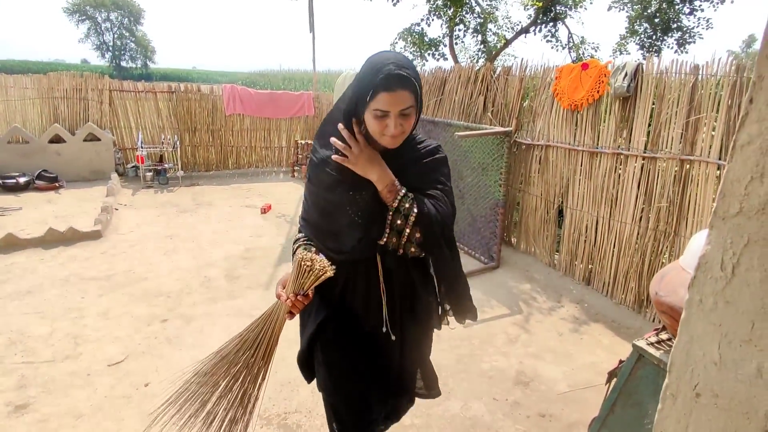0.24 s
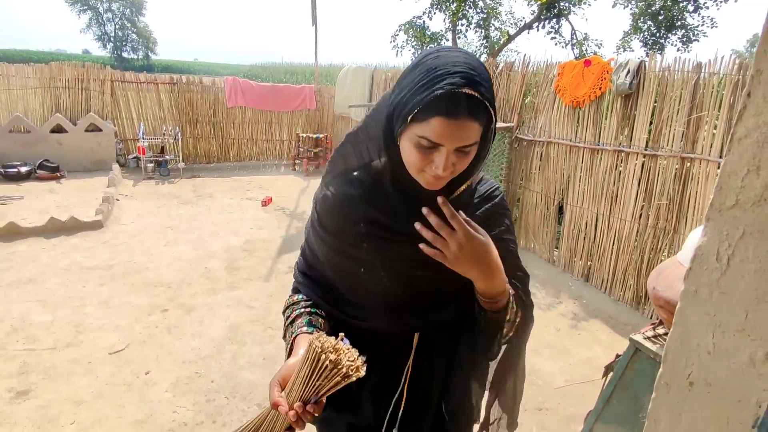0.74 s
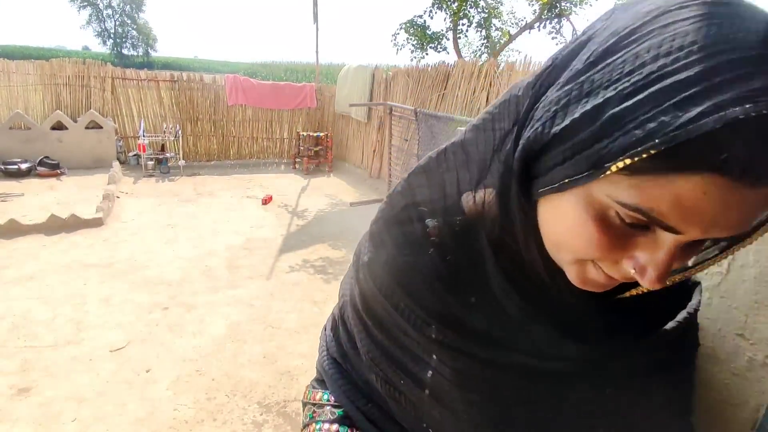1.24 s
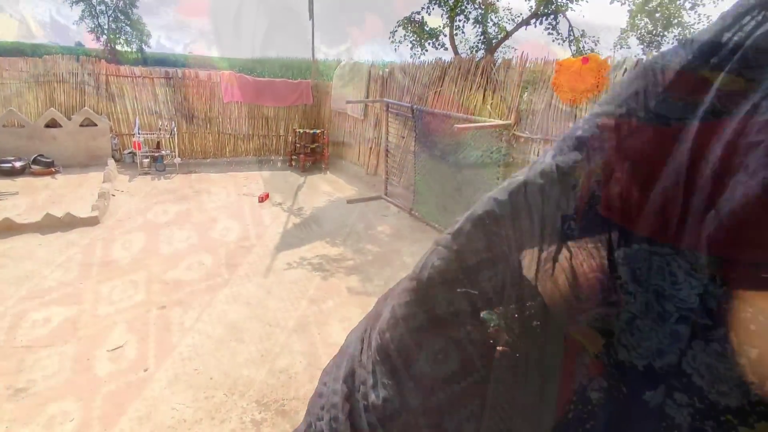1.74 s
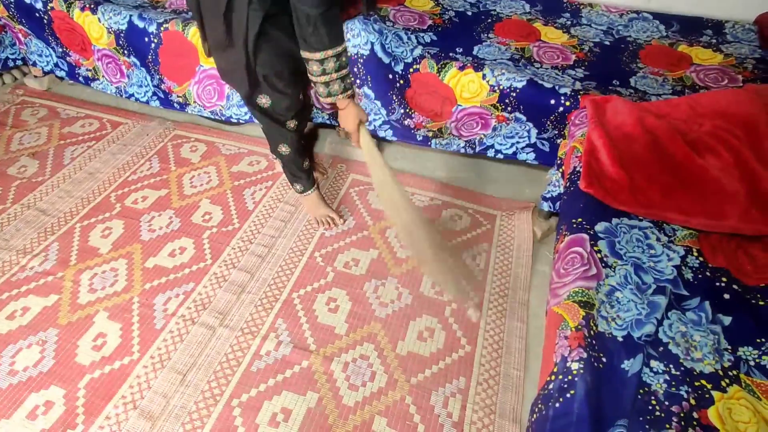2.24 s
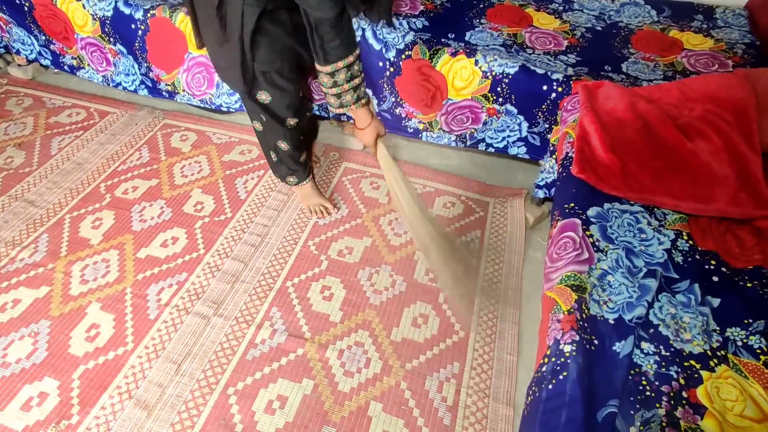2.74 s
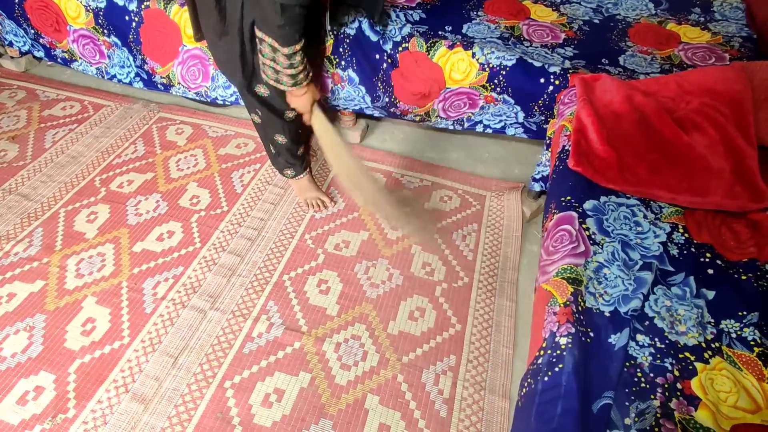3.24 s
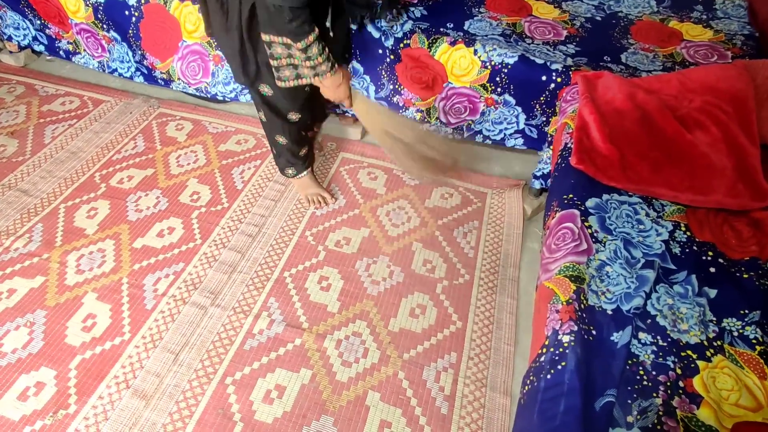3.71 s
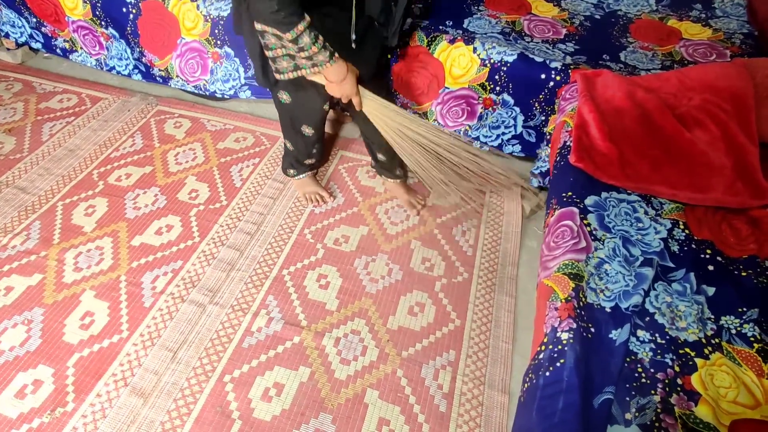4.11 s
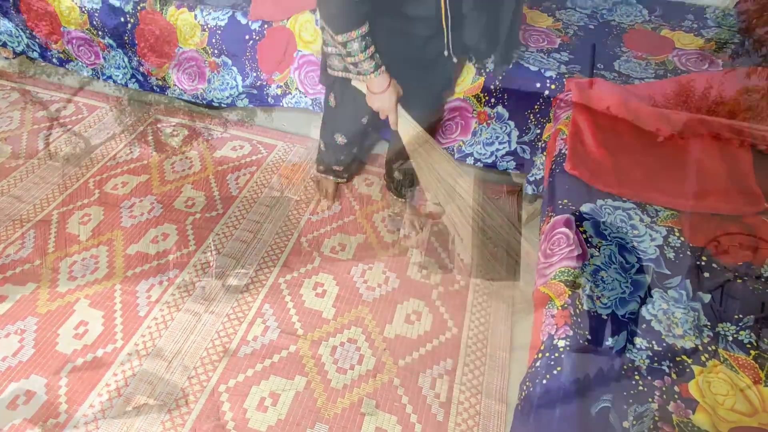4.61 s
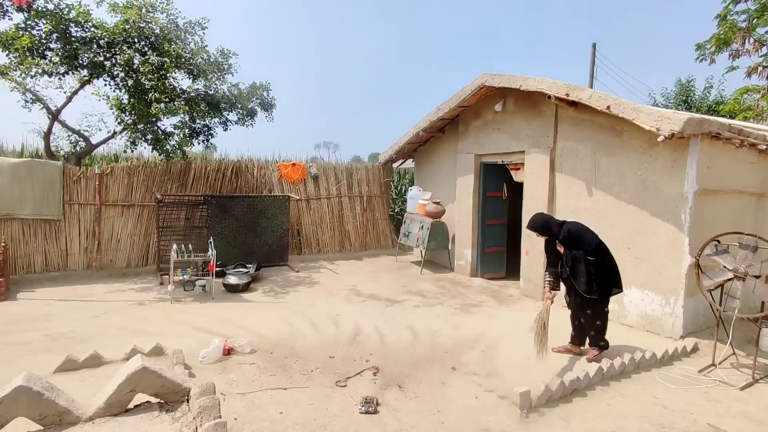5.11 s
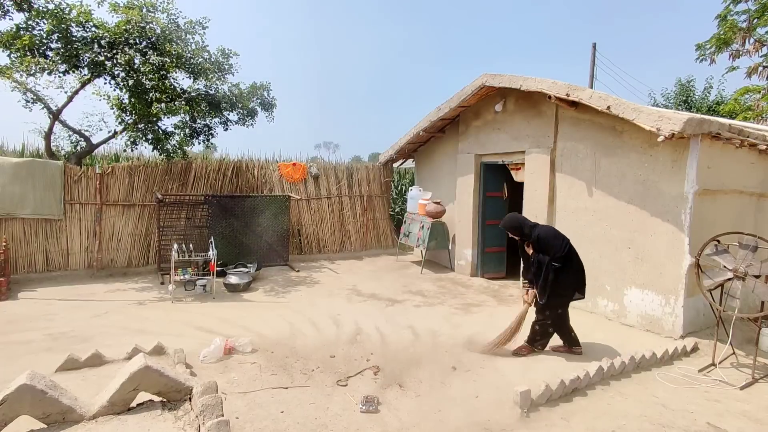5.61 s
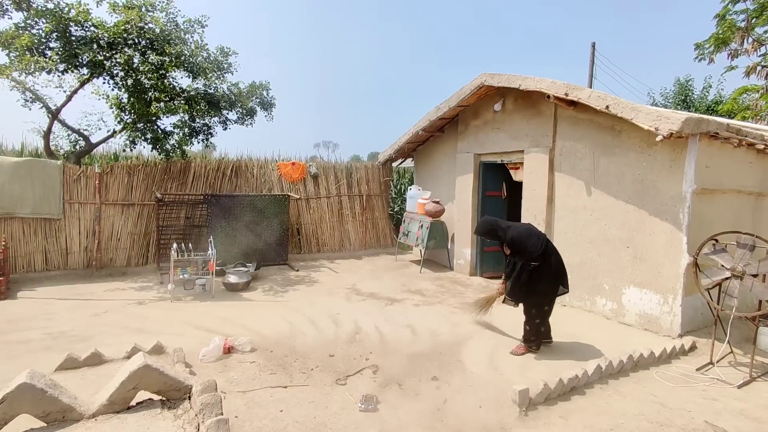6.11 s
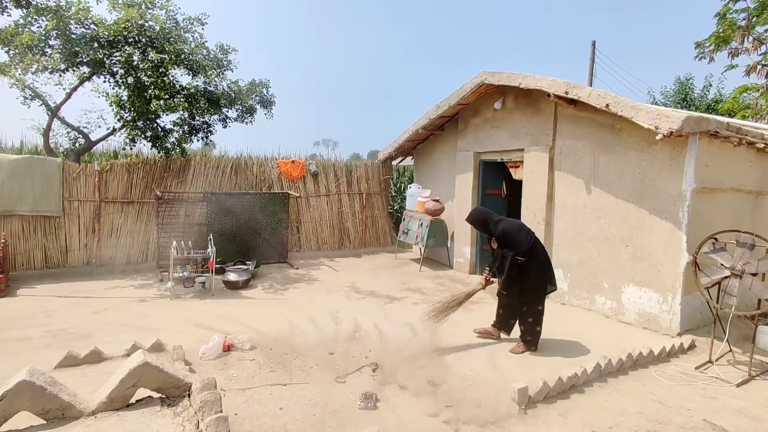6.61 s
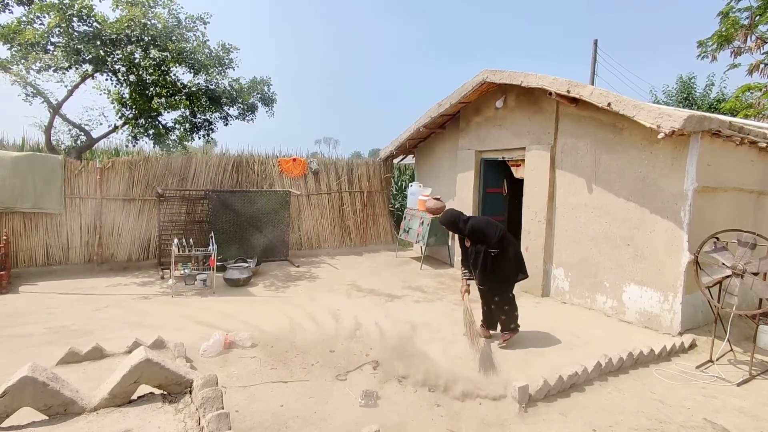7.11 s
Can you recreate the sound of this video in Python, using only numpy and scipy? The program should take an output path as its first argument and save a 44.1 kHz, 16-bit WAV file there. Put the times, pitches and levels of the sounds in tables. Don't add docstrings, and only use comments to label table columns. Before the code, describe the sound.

In a small room with a low humming fan, a shawl rustles and little ticks and a rattle sound, with a tiny bird and a far crow. A grass broom then sweeps a mat close to a handheld stereo phone, in crisp regular hisses. The sound dissolves to an open yard: much quieter, distant sweeps over packed earth, pebble knocks, light wind and a faint tractor.

```python
import sys
import numpy as np
from scipy import signal
from scipy.fft import rfft, irfft, next_fast_len
from scipy.io import wavfile
from scipy.ndimage import uniform_filter1d, map_coordinates

SR = 44100
rng = np.random.default_rng(int(sys.argv[2]) if len(sys.argv) > 2 else 0)


def pcm_store(signal):
    levels = np.round(np.clip(np.atleast_2d(signal), -1, 1) * 32767)
    wavfile.write(sys.argv[1], SR, levels.astype(np.int16).T)


def undo_db(level):
    steps = np.asarray(level, float) / 20
    return 10 ** steps


N = 324165
T = np.arange(N) / SR
HIT_T = np.arange(next_fast_len(SR // 2)) / SR

# peak time in seconds, hiss level in dB, rise in seconds, fall in seconds, squareness.
MAT_SWEEPS = [
    (1.9, -27, 0.29, 0.1, 1.45),
    (2.39, -24.5, 0.17, 0.11, 2.36),
    (2.912, -22, 0.19, 0.082, 1.82),
    (3.43, -21.5, 0.16, 0.11, 2.5),
    (3.945, -21, 0.11, .11, 1.8),
    (4.44, -25, 0.11, 0.13, 2.74),
    (4.895, -30.5, 0.074, 0.28, 1.7),
]
MAT_BRUSHES = [(1.458, -39, 0.019, .04, 1.6), (1.52, -37, 0.094, 0.091, 1.6), (1.609, -45.5, .15, .08, 2),
               (1.692, -35, 0.029, .08, 2), (1.74, -33.5, 0.059, 0.056, 2), (2.02, -42.5, 0.11, 0.11, 2.6),
               (2.17, -43.5, 0.27, 0.081, 2.1), (2.245, -48, 0.02, .09, 2.7), (2.53, -43, 0.17, 0.14, 0.84),
               (2.646, -41.5, 0.037, 0.53, 1.6), (3.04, -39, 0.28, 0.061, 1.8),
               (3.189, -36.5, 0.097, 0.17, 1.2), (3.29, -36.5, 0.018, 0.12, 2.2),
               (3.57, -38.5, .11, .11, 1.34), (3.745, -50, 0.025, .1, 1.4), (3.79, -58, 0.43, .15, 1.6),
               (4.06, -37.5, 0.043, 0.12, 1.1), (4.17, -44, .48, 0.28, 2.1), (4.625, -45, 0.24, 0.039, 2.4),
               (4.74, -48.5, 0.15, 0.16, 1.9), (4.82, -51, 0.021, .06, 1.7), (5.07, -46, .19, 0.22, 1.6)]
# time in seconds, gain in dB.
MAT_FADE = [(1.45, -19.5), (2.25, 0.5), (4.7, 0), (5.3, -8)]
# time in seconds, extra drag in dB.
DIRT_DRAG = [(1.55, -1.5), (1.9, 1), (2.15, 2), (2.3, 3), (2.45, 1.5), (2.65, 1.5), (2.83, 6.5), (2.93, 3),
             (3.05, 0), (3.2, 3.5), (3.32, -1.5), (3.45, 0.5), (3.7, -0.5), (3.95, 1), (4.2, 0), (4.4, 2.5),
             (4.5, -0.5), (4.9, -4)]
# time in seconds, added level in dB.
TIP_SKIM = [(1.7, 1), (1.9, 0), (2.3, -2.5), (2.5, 5), (2.7, -2), (2.9, -2), (3.05, 5.5), (3.3, -4.5),
            (3.6, 2.5), (3.95, -3), (4.2, 4.5), (4.45, 0.5), (4.9, -6)]
# time in seconds, level against the hiss in dB.
CAVITY_RING = [(1.7, -19), (1.9, -12.5), (2.2, -17), (2.39, -4), (2.7, -11), (2.91, -9), (3.19, -10),
               (3.43, -10), (3.7, -19), (3.95, -7), (4.2, -11.5), (4.44, -6), (4.7, -22.5), (4.9, -5.5),
               (5.1, -19)]
# frequency in Hz, left in dB, right in dB.
MAT_PORTS = [(500, -39.5, -50), (1250, -16.5, -31), (2170, -11, -8.5), (4080, -9, -6.5), (4500, -6, -11),
             (6270, -7, -2), (7540, -5.5, 1.5), (7870, -6, -1.5), (8450, -3, -11.5), (9700, -9, -7.5),
             (10500, -25, -10), (12270, -4.5, -10), (13900, -7, -9.5), (14200, -2.5, -5.5)]
# frequency in Hz, left in dB, right in dB.
DRAG_PORTS = [(399, -20.5, -22), (890, -13, -19.5), (1500, -10.5, -10), (2300, -6, -0.5), (3270, -8.5, -3),
              (3840, -9, -1), (6970, -36, -10.5)]
# frequency in Hz, left in dB, right in dB.
CAVITY_PORTS = [(5420, -46.5, -46), (6530, -24.5, -7.5), (6930, -11, 0), (7400, -15, 1),
                (7580, -20.5, -4.5), (8100, -32, -19), (9100, -50, -40)]
# frequency in Hz, left in dB, right in dB.
TIP_PORTS = [(6470, -37.5, -39), (8726, -3, -0.5), (10500, -3.5, 4.5), (13000, -3, 4), (14200, -4, -1)]

# peak time in seconds, hiss level in dB, rise in seconds, fall in seconds, squareness.
EARTH_PASSES = [
    (5.0, -41.5, .15, 0.25, 1.73),
    (5.73, -44, 0.15, 0.17, 2.3),
    (6.385, -43, 0.15, 0.18, 2.4),
    (7.03, -43.5, .12, 0.19, 2.55),
]
# peak time in seconds, hiss level in dB, rise in seconds, fall in seconds.
EARTH_TRAILS = [(5.19, -55, .1, 0.045), (5.27, -73, .06, .1), (5.36, -69, 0.12, 0.086),
                (5.57, -61, 0.039, 0.072), (5.9, -56, 0.083, 0.11), (6.03, -67.5, .3, 0.14),
                (6.11, -66, 0.041, 0.043), (6.67, -67.5, 0.46, 0.093), (6.85, -66, 0.054, 0.13),
                (7.02, -49, 0.063, 0.055), (7.28, -63, 0.16, 0.11)]
# frequency in Hz, left in dB, right in dB.
EARTH_PORTS = [(800, -23, -32), (2500, -10.5, -12), (3550, -8, -6), (4520, -9.5, -6.5), (6130, -3.5, -4.5),
               (6470, -9, -1), (7160, -9, -2.5), (8660, 0, -20), (9430, -8, -15), (9900, -10, -12),
               (10900, -12, -16), (12600, -4, -9), (14400, -14, -12)]
# frequency in Hz, left in dB, right in dB.
SCRAPE_PORTS = [(417, -28, -44), (970, -13.5, -9.5), (1340, -13.5, -23), (1700, -2.5, -3), (2040, -4, -8),
                (2980, -17, -8), (5000, -19.5, -29)]
# frequency in Hz, left in dB, right in dB.
WHISK_PORTS = [(8000, -44, -38), (11000, -15, -9), (12450, 1.5, -11), (13800, -1.5, -2)]
# time in seconds, level in dB, centre in Hz.
FURROW = [
    (4.86, -62, 2130),
    (4.95, -57, 2090),
    (5.02, -51, 1800),
    (5.08, -54, 1963),
    (5.16, -71, 1900),
]

# peak time in seconds, level in dB, rise in seconds, fall in seconds.
RUSTLES = [(.122, -62.5, .008, 0.14), (.212, -60.5, 0.083, .14), (.388, -66, 0.045, 0.25),
           (.52, -65, .06, .025), (.776, -61.5, .1, 0.067), (.908, -56, .04, 0.1), (1.0, -63.5, 0.31, 0.48),
           (1.312, -61, .03, .03), (1.336, -50, 0.0069, 0.082), (1.47, -70, 0.052, 0.012)]
# frequency in Hz, left in dB, right in dB.
SHAWL_PORTS = [(805, -25, -28), (2000, -5, 7.5), (4000, -2, 2), (7300, -8, 5.5), (8500, -1, -6),
               (10000, -15, -6), (12000, -6, -9), (14000, -12, -6)]
# start in seconds, peak in dB, frequency in Hz, t60 in seconds, left-right in dB.
TICKS = [
    (.1308, -33, 1650, .0023, -16),
    (.1309, -45, 3900, .002, -16),
    (1.629, -45, 2360, .0025, -7),
]
# start in seconds, peak in
# dB, frequency in Hz, t60 in seconds, left-right in dB.
PEBBLES = [(5.884, -47, 1500, .015, 8), (5.893, -41, 1700, 0.022, 11), (5.913, -46, 1500, .015, 7),
           (5.933, -46, 1650, .015, 9), (5.944, -39, 1700, .014, 9), (5.956, -52, 1500, .015, 9),
           (6.011, -53, 1700, .012, 5), (6.045, -49, 1548, .015, 11), (6.0657, -34.5, 2090, 0.0063, 10),
           (6.093, -50, 1600, .012, 6), (0.132, -38, 520, 0.0076, -21)]
# start in seconds, peak in dB.
RATTLE = [
    (0.5168, -34),
    (0.5198, -35),
    (.5240, -41),
    (.5300, -48),
    (.5350, -48),
]
# frequency in Hz, level in dB, t60 in seconds.
PART_MODES = [(2250, -5.5, 0.013), (2890, 0.5, 0.014), (3750, -9, 0.015), (6300, -19, .01)]
# start in seconds, peak in dB, frequency in Hz, length in seconds, left-right in dB.
SCUFFS = [
    (0.865, -54, 1820, 0.014, -4.0),
    (4.712, -49, 1600, .015, 0),
    (5.919, -52, 1550, 0.043, 9),
    (6.658, -51, 1700, 0.017, 7),
    (6.845, -58, 1400, .02, 5),
    (7.279, -49, 1550, 0.022, 6),
    (7.312, -55, 1500, .022, 6),
]
# start in seconds, peak in dB, frequency in Hz, length in seconds, breadth in log Hz.
HEELS = [
    (1.331, -40.5, 600, .026, .75),
    (5.8, -59, 330, .15, .3),
    (6.95, -55, 340, .24, .3),
]
# start in seconds, peak in dB, frequency in Hz, length in seconds, breadth in log Hz.
RUBS = [
    (0.22, -62, 7200, 0.026, .05),
    (1.332, -41.5, 2700, 0.022, 0.46),
    (1.3325, -49.5, 6300, .03, .26),
]

# time in seconds, level in dB.
FAN_LEVEL = [(0, -52.5), (1.36, -50), (1.67, -51), (2.7, -45.5), (4.15, -46.5), (4.8, -56), (5.3, -75)]
# frequency in Hz, level in dB per Hz.
FAN_AIR = [(60, -56), (100, -18), (145, -6), (190, 4), (260, -3.5), (350, -3.5), (450, -9.5), (700, -16),
           (1500, -66)]
# peak time in seconds, level in dB.
ROTOR_SWELLS = [(.07, -48), (.38, -50), (.7, -50), (1.01, -53.5), (1.328, -46), (1.65, -52), (1.98, -51.5),
                (2.35, -47), (2.66, -44.5), (2.98, -48), (3.31, -47), (3.62, -48.5), (3.94, -48.5),
                (4.23, -48), (4.53, -47.5), (4.87, -53.5)]
# time in seconds, level in dB.
PUMP_LEVEL = [(0, -61), (.6, -54.5), (1.5, -57.5), (2.2, -62), (2.6, -82)]
# frequency in Hz, level in dB per Hz.
PUMP_BAND = [(40, -17.5), (70, 1.5), (95, -5), (120, -10.5), (148, 2), (175, -18), (260, -49)]

# time in seconds, level in dB.
WIND_LEVEL = [(0, -52), (1.8, -55.5), (2.37, -50), (2.8, -58), (3.66, -53), (4.45, -48), (4.75, -54.5),
              (5.1, -48), (6.5, -57.5), (7.35, -58)]
# time in seconds, added level in dB, left-right in dB.
PUFFS = [
    (2.15, -1, 10),
    (2.75, 3, -1),
    (3.3, 3.5, 3),
    (4.05, -0.5, 21.5),
    (6.48, 5, 15),
    (6.67, 4, -18),
    (7.0, 4, 11),
]
# frequency in Hz, level in dB per Hz.
WIND_RUMBLE = [(10, 5.5), (18, 4.5), (45, -3.5), (65, -8.5), (100, -15.5), (160, -30.5), (300, -58.5)]
# time in seconds, level in dB.
WASH_LEVEL = [(0, -57.5), (2, -57), (4.5, -55.5), (5.3, -65.5), (7.35, -64)]
# time in seconds, share of the yard.
DISSOLVE = [(4.75, 0.0035), (5.3, 0.98)]
# frequency in Hz, left in dB, right in dB.
ROOM_PORTS = [(298, -9, -3), (593, -2.5, -0.5), (1299, -4, 0), (2010, -8.5, -2.5), (3230, -14.5, -8.5),
              (5000, -21, -15), (6800, -23, -16), (7780, -20, -16), (8700, -24, -29), (10500, -24.5, -23),
              (12500, -30, -24.5), (14000, -16.5, -19.5)]
# frequency in Hz, left in dB, right in dB.
YARD_PORTS = [(117.3, 4.5, 12.5), (305, 4, 8), (800, 4, 1.5), (1800, 1, 1.5), (3000, -1.5, 2),
              (5000, -7, -3.5), (6700, -9, -4), (8400, -8, -16.5), (9500, -10, -23.5), (10600, -17, -16.5),
              (12000, -15, -16), (13970, -6.5, -9)]
# time in seconds, level in dB, frequency in Hz.
SWAY = [
    (4.25, -63, 14.5),
    (4.36, -36, 19),
    (4.55, -37, 23),
    (4.66, -62, 13),
]

# start in seconds, level in dB, from Hz, to Hz, length in seconds.
CHIRPS = [
    (.125, -69, 10200, 9900, .015),
    (0.13, -64, 10100, 9700, 0.045),
    (0.365, -72, 10200, 9700, .035),
    (.385, -69, 13400, 13200, .015),
    (0.488, -72, 10500, 9500, .04),
]
# time in seconds, level in dB, loudest partial in Hz.
CROW_CALL = [
    (.92, -68, 1487),
    (.95, -64, 1557),
    (1.02, -58, 1546),
    (1.06, -60, 1546),
    (1.09, -61, 1406),
    (1.15, -70, 1340),
]
# time in seconds, level in dB, firing rate in Hz.
TRACTOR = [
    (4.8, -73, 69),
    (5.3, -62, 68.9),
    (5.9, -51, 64.2),
    (6.2, -55.5, 66),
    (6.6, -55, 54.7),
    (7.3, -58, 52),
]

# frequency in Hz, left-right likeness.
PORT_LIKENESS = [(30, 0.52), (70, 0.76), (130, 0.94), (300, 1), (650, 0.56), (1400, 0.16), (3000, 0.011),
                 (15000, 0)]
# frequency in Hz, sigmas of chance in the room, in the yard.
LOSS_RARITY = [(600, 9, 9), (1000, 3, 2.6), (2000, 2.6, 2.3), (2700, 2.3, 2.1), (3500, 2.2, 2.0),
               (4500, 2.4, 2.2), (7800, 2.5, 2.5), (8600, 1.05, 1.7), (11200, 1.15, 1.3), (12500, 1.4, 2.1),
               (14000, 2.3, 2.5)]
# start in seconds, end in seconds, low edge in Hz, high edge in Hz.
LOST_BANDS = [(5.13, 5.17, 3500, 3800), (5.59, 5.64, 2980, 3200), (5.76, 5.8, 2670, 2850),
              (5.83, 5.9, 3030, 3220), (6.25, 6.29, 3820, 3980), (6.27, 6.38, 3100, 3420),
              (6.41, 6.45, 2500, 2830), (6.48, 6.52, 2750, 2970), (6.56, 6.6, 2500, 2660),
              (6.67, 6.71, 3950, 4120), (7.1, 7.15, 1400, 1560), (7.17, 7.24, 3180, 3330)]


def unit(x):
    return x / np.sqrt(np.mean(x ** 2) + 1e-20)


def in_db(gain):
    return 20 * np.log10(gain + 1e-9)


def over_time(points):
    return np.interp(T, *np.transpose(points))


def along(points, hz):
    f, *cols = np.transpose(points)
    return np.array([np.interp(np.log(hz + 1), np.log(f + 1), c) for c in cols])


def curves(rows, fade=.03):
    s, *cols = np.vstack(rows).T
    out = [np.interp(T, s, c) for c in cols]
    outside = np.clip(np.maximum(s[0] - T, T - s[-1]) / fade, 0, 1)
    out[0] = out[0] - 60 * outside
    return out


def phase(hz):
    return 2 * np.pi * np.cumsum(hz) / SR


def wobble(rate):
    coarse = T[::16]
    knots = rng.standard_normal(int(N * rate / SR) + 4)
    return np.interp(T, coarse, map_coordinates(knots, [coarse * rate]))


def filtered(x, response):
    m = next_fast_len(N + 8192)
    return irfft(rfft(x, m) * response(np.fft.rfftfreq(m, 1 / SR)), m)[..., :N]


def panned(db):
    return undo_db(np.array([db / 2, -db / 2])).reshape(2, -1)


def placed(events):
    out = np.zeros((2, N + SR))
    for start, sound in events:
        out[:, round(start * SR):][:, :sound.shape[1]] += sound
    return out[:, :N]


def strokes(rows, square, early=1, late=1):
    t = T[::32]
    power = 0
    for s, db, rise, fall, *own in rows:
        u = np.where(t < s, (s - t) / (rise * early), (t - s) / (fall * late))
        power = power + undo_db(db - 20 * u ** (own[0] if own else square)) ** 2
    return np.interp(T, t, in_db(np.sqrt(power)))


def rush(ports, patchy_db, grain_db=0, clump_db=0):
    slips = rng.standard_normal((2, N))
    if clump_db:
        grain = np.minimum(rng.exponential(size=(2, N)), 4)
        slips = slips * undo_db(grain_db * grain + clump_db * wobble(350))
    z = signal.stft(slips, nperseg=256)[2]
    field = uniform_filter1d(rng.standard_normal(z.shape[1:]), size=5, axis=0)
    field = uniform_filter1d(field, size=16, axis=1)
    m = next_fast_len(N, True)
    a, b = rfft(signal.istft(z * undo_db(patchy_db * unit(field)), nperseg=256)[1], m)
    hz = np.fft.rfftfreq(m, 1 / SR)
    turn = np.arccos(np.clip(along(PORT_LIKENESS, hz)[0], -1, 1)) / 2
    mid, side = a * np.cos(turn), b * np.sin(turn)
    pair = np.array([mid + side, mid - side])
    return unit(irfft(pair * undo_db(along(ports, hz)), m)[:, :N])


def broom(levels_db, layers, side_db, gain_db, grain_db, clump_db):
    hiss_db, *over_db = levels_db
    sound = rush(layers[0], patchy_db=1.38, grain_db=grain_db, clump_db=clump_db)
    for db, ports in zip(over_db, layers[1:]):
        sound = sound + undo_db(db - 1.5) * rush(ports, patchy_db=1.24, grain_db=grain_db, clump_db=clump_db)
    judder_db = .6 * wobble(36)
    return undo_db(hiss_db + gain_db + judder_db) * panned(side_db) * sound


def mat_broom():
    full_db, bend_lag_s, bend_slope = -22, 0.023, 0.48
    hiss_db = strokes(MAT_SWEEPS + MAT_BRUSHES, square=1.58)
    lagging_db = np.interp(T - bend_lag_s, T, hiss_db)
    bend = np.minimum(undo_db(bend_slope * (lagging_db - full_db)), 1.2)
    drag_db = -2 - 10.5 * bend + over_time(DIRT_DRAG)
    tip_db = -6.5 - 9 * bend + over_time(TIP_SKIM)
    lean_db = -0.64 - 2.5 * bend - 1.0
    levels_db = [hiss_db + over_time(MAT_FADE), drag_db, over_time(CAVITY_RING), tip_db]
    layers = [MAT_PORTS, DRAG_PORTS, CAVITY_PORTS, TIP_PORTS]
    return broom(levels_db, layers, lean_db, gain_db=3.5, grain_db=2.5, clump_db=0.82)


def earth_broom():
    square, scrape_lead_s = 1.6, 0.0076
    hiss_db = np.maximum(strokes(EARTH_PASSES + EARTH_TRAILS, square), -88)
    lead_db = np.clip(np.interp(T + scrape_lead_s, T, hiss_db) - hiss_db, -6, 4)
    scrape = undo_db(-9 - 4 * (T < 5.4) + lead_db)
    shuffle = undo_db(-73.5 - hiss_db)
    scrape_db = in_db(np.hypot(scrape, shuffle))
    swing_db = strokes(EARTH_PASSES, square, early=1.4, late=1.1)
    whisk_db = np.clip(-2 + swing_db - hiss_db, -12, 8)
    side_db = 2 + 0.19 * whisk_db - 0.5
    layers = [EARTH_PORTS, SCRAPE_PORTS, WHISK_PORTS]
    return broom([hiss_db, scrape_db, whisk_db], layers, side_db, gain_db=5.0, grain_db=-0.5, clump_db=1.0)


def stalk():
    width_hz = 300
    level_db, hz = curves(FURROW, fade=.08)
    turns = phase(hz)
    pair = [wobble(width_hz) * np.sin(turns) + wobble(width_hz) * np.cos(turns) for _ in range(2)]
    return undo_db(level_db) * panned(-1.5) * np.array(pair)


def cloth():
    level_db = strokes(RUSTLES, 1) + 3.5
    return undo_db(level_db) * panned(-.6) * rush(SHAWL_PORTS, patchy_db=2.5, grain_db=1.2, clump_db=1.2)


def ticks():
    events = []
    for s, db, hz, t60, side_db in TICKS:
        shape = undo_db(db + 14.5 - 60 * HIT_T / t60) * np.clip(HIT_T * hz / 1.4, 0, 1)
        events.append((s, -shape * panned(side_db) * np.sin(2 * np.pi * hz * HIT_T)))
    return placed(events)


def pebbles():
    events = []
    for s, db, hz, t60, side_db in PEBBLES:
        ring = np.sin(2 * np.pi * hz * HIT_T) + 0.36 * np.sin(2 * np.pi * 1.45 * hz * HIT_T)
        ring = ring + 0.2 * rng.standard_normal(len(HIT_T))
        ring = ring * (1 + .7 * unit(uniform_filter1d(rng.standard_normal(len(HIT_T)), size=50)))
        shape = undo_db(db - 60 * HIT_T / t60) * np.clip(HIT_T / 0.001, 0, 1)
        events.append((s, shape * panned(side_db) * ring))
    return placed(events)


def rattle():
    events = []
    for s, db in RATTLE:
        ring = 0
        for hz, level, t60 in PART_MODES:
            mode_db = level + rng.normal(0, 2.3) - 60 * HIT_T / t60
            ring = ring + undo_db(mode_db) * np.sin(2 * np.pi * hz * HIT_T)
        events.append((s, undo_db(db) * panned(-11.0) * ring * np.clip(HIT_T / 0.00064, 0, 1)))
    return placed(events)


def feet():
    rows = [(*row[:4], 0.23, row[4]) for row in SCUFFS]
    rows += [(*row, 0) for row in HEELS] + [(*row, -11.5) for row in RUBS]
    f = np.fft.rfftfreq(len(HIT_T), 1 / SR)
    events = []
    for s, db, hz, length, breadth, side_db in rows:
        band = 1 / (1 + (np.log((f + 1) / hz) / breadth) ** 4)
        grit = irfft(rfft(rng.standard_normal((2, len(HIT_T)))) * band, len(HIT_T))
        shape = np.clip(HIT_T / (0.083 * length), 0, 1) / (1 + (HIT_T / length) ** 6)
        events.append((s, undo_db(db - 7.5) * panned(side_db) * shape * unit(grit)))
    return placed(events)


def rotor():
    slow = np.arange(0, N / SR, .005)
    level = 0
    for s, db in ROTOR_SWELLS:
        width_s = 0.063 * np.where(slow > s, 1.65, 1)
        level = level + undo_db(db - ((slow - s) / width_s) ** 2 * 20 / np.log(10))
    return np.interp(T, slow, level)


def fan():
    air_db, = curves(FAN_LEVEL, fade=0.25)
    blades = undo_db(air_db - 6.0 + 1.2 * wobble(15.0)) * rush(FAN_AIR, patchy_db=2.0)
    throb = rotor() * np.sin(2 * np.pi * 200.6 * T + 1.0 * wobble(3.98))
    fading = np.clip((5.3 - T) / 1.23, 0, 1)
    steady_level = undo_db(-59 + 4.5 + 2.4 * wobble(15)) * fading
    steady = steady_level * np.sin(2 * np.pi * 300.8 * T + 1.17 * wobble(7))
    engine = undo_db(curves(PUMP_LEVEL)[0]) * rush(PUMP_BAND, patchy_db=1.1)
    return blades + throb + steady + engine


def air():
    puff_s = 0.079
    wind_db, = curves(WIND_LEVEL)
    gust_db, side_db = sum(np.outer(db, np.exp(-((T - s) / puff_s) ** 2)) for s, *db in PUFFS)
    yard = np.clip(over_time(DISSOLVE), 0, 1)
    room_wash = np.sqrt(1 - yard) * rush(ROOM_PORTS, patchy_db=2.5) * undo_db(1.5)
    yard_wash = np.sqrt(yard) * rush(YARD_PORTS, patchy_db=2.0) * undo_db(5.0)
    lumps = undo_db(0.78 * np.array([wobble(24), wobble(20)])) * panned(side_db)
    wind = undo_db(wind_db + gust_db + 5.0) * lumps * rush(WIND_RUMBLE, patchy_db=0.2)
    return undo_db(curves(WASH_LEVEL)[0]) * (room_wash + yard_wash) + wind


def sway():
    level_db, hz = curves(SWAY, fade=.1)
    return undo_db(level_db) * panned(6.3) * np.sin(phase(hz))


def bird():
    out = np.zeros(N)
    for s, db, from_hz, to_hz, length in CHIRPS:
        u = np.linspace(0, 1, round(length * SR))
        glide = phase(from_hz + (to_hz - from_hz) * u ** 2)
        out[round(s * SR):][:len(u)] += undo_db(db) * np.sin(np.pi * u) * np.sin(glide)
    return out * undo_db(4.3 * wobble(600)) * panned(-15.0)


def throat(f):
    upper = 1j * f * 330 / (1500 ** 2 - f * f + 1j * f * 330)
    lower = 1j * f * 500 / (780 ** 2 - f * f + 1j * f * 500)
    return upper ** 2 + undo_db(-13.5) * lower


def crow():
    level_db, hz = curves(CROW_CALL, fade=.04)
    turns = np.cumsum(hz / 6 * (1 + .006 * wobble(90))) / SR
    pulses = np.diff(np.floor(turns), prepend=0) * undo_db(2.2 * rng.standard_normal(N))
    breath = .045 * rng.standard_normal((2, N))
    return undo_db(level_db + 5) * unit(filtered(pulses + breath, throat))


def tractor():
    level_db, hz = curves(TRACTOR, fade=.3)
    turns = phase(hz) + 0.56 * wobble(6)
    return undo_db(level_db + 3 + 2.2 * wobble(7)) * (np.sin(turns) + undo_db(-11) * np.sin(1.5 * turns))


def scene():
    yard = np.clip((T - 4.95) / 0.13, 0, 1)
    brooms = mat_broom() * np.sqrt(1 - yard) + earth_broom() * np.sqrt(yard) + stalk()
    contacts = ticks() + pebbles() + rattle() + feet()
    return brooms + cloth() + contacts + fan() + air() + sway() + bird() + crow() + tractor()


def top_cut(x):
    return signal.sosfilt(signal.butter(12, 14450, fs=SR, output="sos"), x)


def record(dry):
    top_hz = 14300
    hz, s, z = signal.stft(dry, SR, nperseg=2048)
    luck = rng.standard_normal((3, len(hz) // 5 + 1, z.shape[2]))
    luck = unit(uniform_filter1d(luck[:2] + 5 * luck[2], size=2, axis=2))
    luck = np.repeat(luck, 5, axis=1)[:, :len(hz)]
    hiss = np.sum(np.abs(z[:, hz > 5000]) ** 2, axis=(0, 1)) > undo_db(-54) ** 2
    busy = np.outer(np.abs(hz - 3200) < 750, hiss)
    room_rarity, yard_rarity = along(LOSS_RARITY, hz)[:, :, None]
    rarity = np.where(s < 5, room_rarity, yard_rarity)
    dropped = luck > rarity - .8 * busy * (s > 5.1) + .6 * hiss * (s < 5)
    dropped = dropped | np.roll(dropped, 1, axis=2)
    for start, end, low_hz, high_hz in LOST_BANDS:
        frames = slice(round(start * SR / 1024), round(end * SR / 1024) + 1)
        dropped[:, (hz > low_hz) & (hz < high_hz), frames] = True
    quiet = np.sum(np.abs(z) ** 2, axis=(0, 1)) < undo_db(np.where(s < 5.3, -30, -25)) ** 2
    edge = np.clip((top_hz + 100 - hz) / 200, 0, 1)[:, None] ** 2
    mix = signal.istft(z * ~(dropped & quiet) * edge, SR, nperseg=2048)[1][:, :N]
    return top_cut(mix)


dry = scene()
out = record(dry)
pcm_store(out)
```